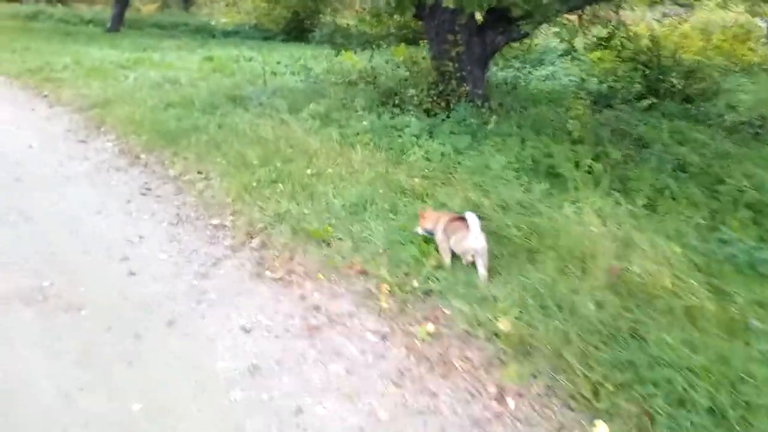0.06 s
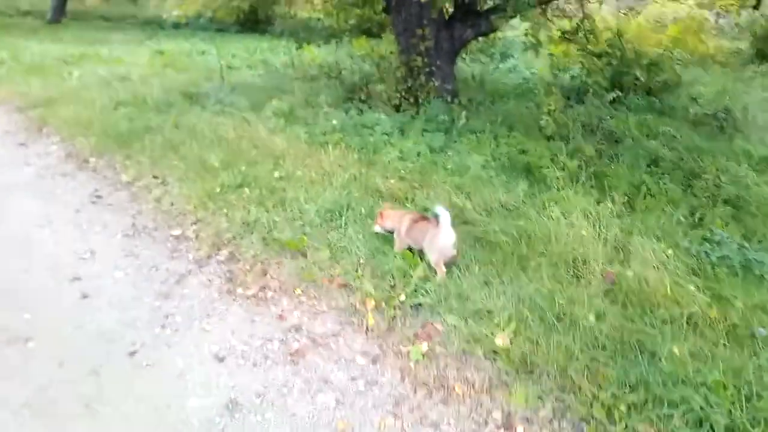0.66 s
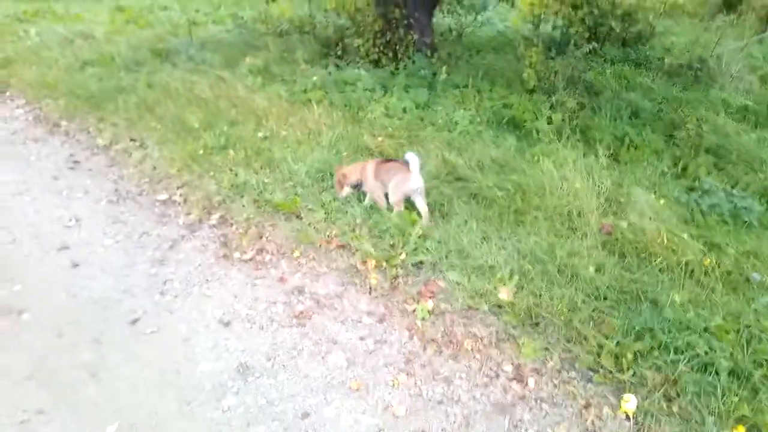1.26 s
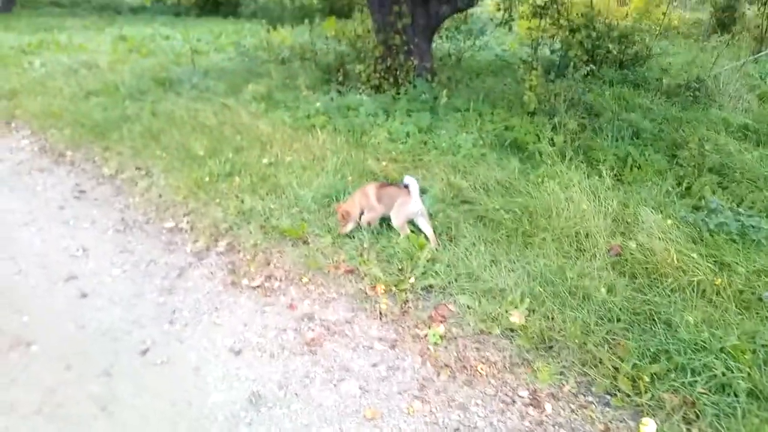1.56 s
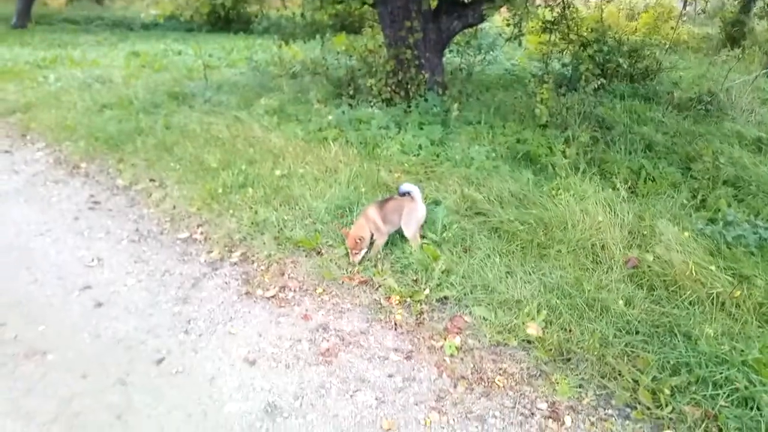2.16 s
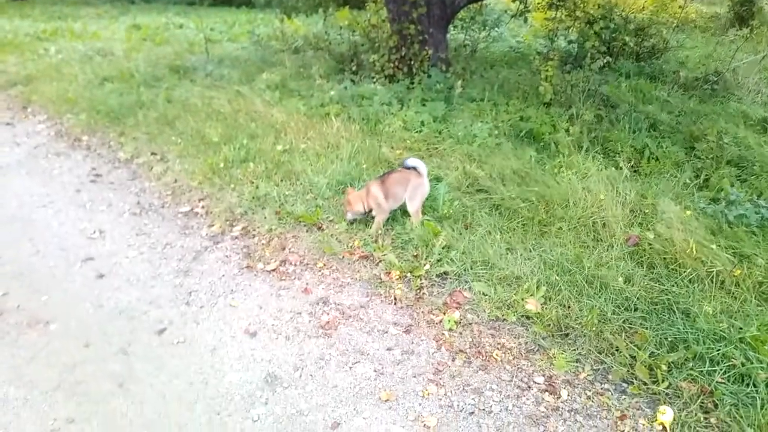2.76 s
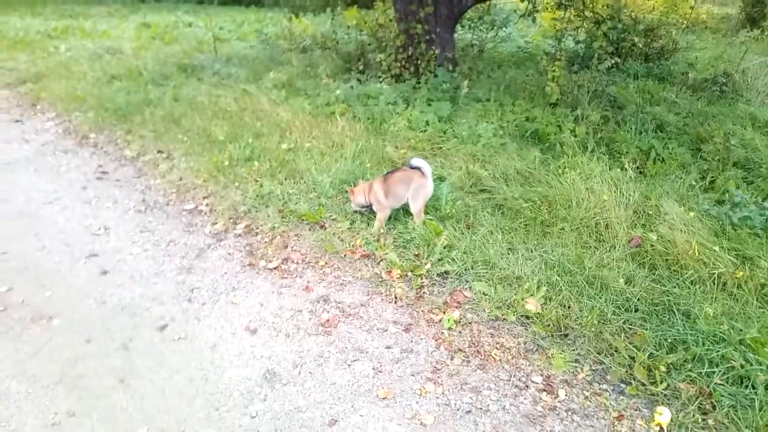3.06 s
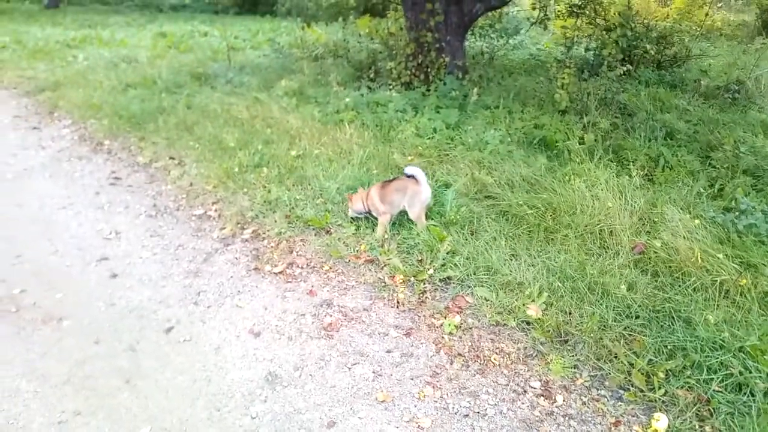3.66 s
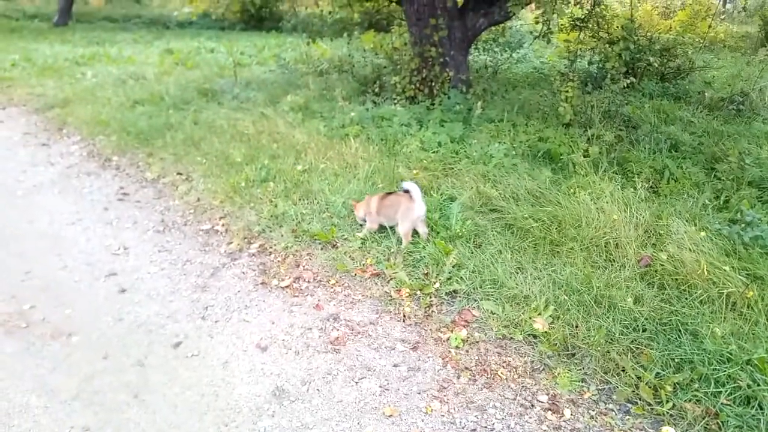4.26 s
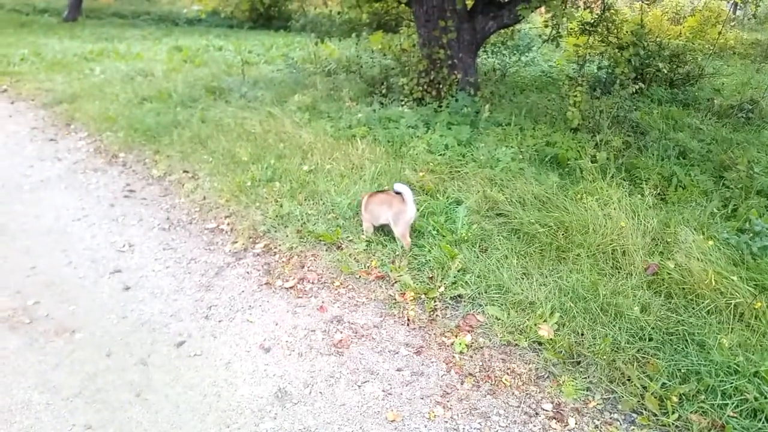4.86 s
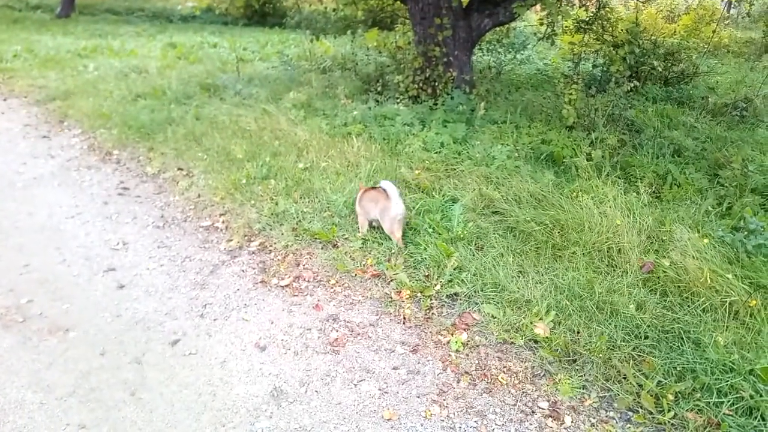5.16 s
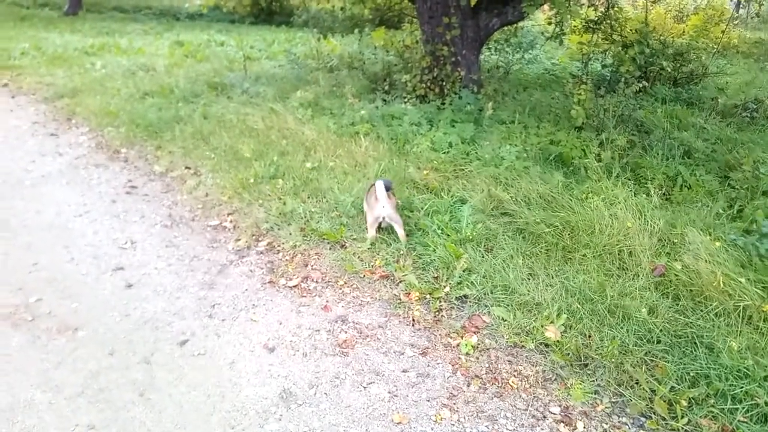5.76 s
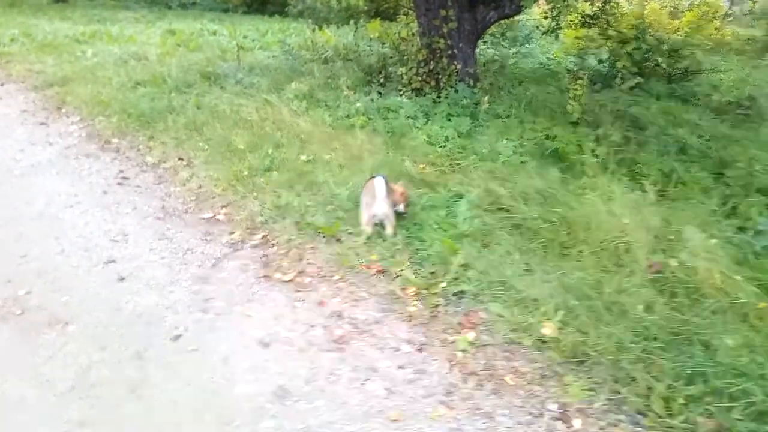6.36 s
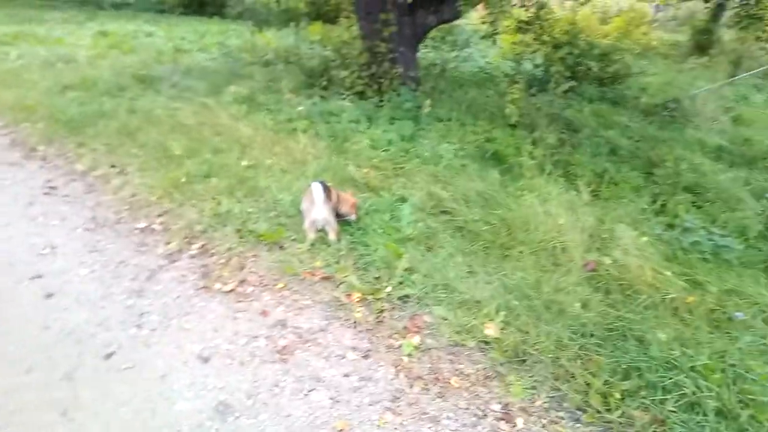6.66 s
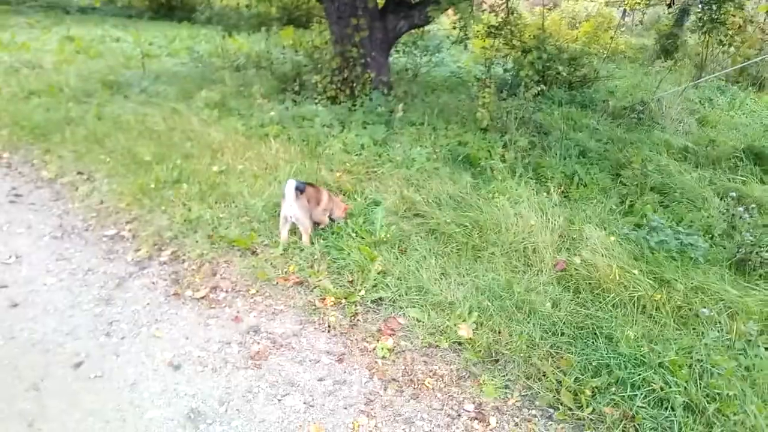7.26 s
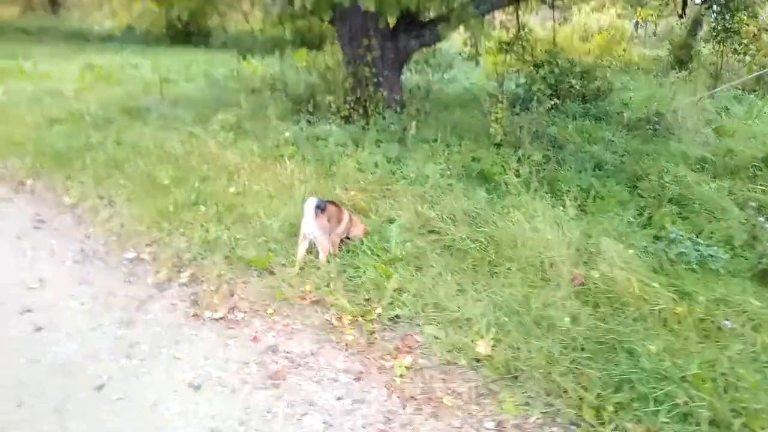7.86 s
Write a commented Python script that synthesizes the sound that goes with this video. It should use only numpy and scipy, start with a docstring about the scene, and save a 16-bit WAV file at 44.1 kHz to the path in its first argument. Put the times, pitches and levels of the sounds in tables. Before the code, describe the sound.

Grass swishes and dry stalks crackle as a small dog walks and stops, with a few short squeaks over soft outdoor air.

```python
"""A puppy walks through grass beside a path, close to the microphone, then stops and noses about.
Blades slip past each other in a fine rustle, stalks and dry leaves snap, and paws sweep the turf.
A soft whirr dies away as the walking ends. Three thin squeaks, each a buzz that slows in jumps,
fall into a rasp. Farther off, faint chirps sound over the low rumble and hiss of the open air."""
import sys
import numpy as np
from scipy import signal
from scipy.fft import rfft, irfft, next_fast_len
from scipy.io import wavfile
from scipy.ndimage import uniform_filter1d

SR = 44100
rng = np.random.default_rng(int(sys.argv[2]) if len(sys.argv) > 2 else 0)


def int16_out(signal):
    """Quantize to a 16-bit WAV file."""
    q = np.round(np.clip(np.atleast_2d(signal).T, -1, 1) * 32767)
    wavfile.write(sys.argv[1], SR, q.astype(np.int16))


N = 352824
TIME = np.arange(N) / SR

# a leg or the muzzle pushes through the blades: t/s at its height, length/s, level/dB
BRUSHES = [(0.022, 0.11, -40.5), (0.195, 0.11, -46.5), (0.309, 0.17, -39), (0.43, 0.22, -45),
           (0.513, 0.038, -39.5), (0.595, .05, -39), (0.648, 0.094, -43), (0.783, 0.24, -48.5),
           (0.97, 0.11, -55), (1.049, 0.054, -46), (1.198, 0.091, -48), (1.281, 0.036, -40.5),
           (1.359, 0.042, -47), (1.488, 0.059, -57.5), (2.56, 0.13, -64), (2.883, 0.072, -48.5),
           (3.054, 0.13, -61), (3.974, 0.14, -58.5), (4.575, 0.19, -61), (4.845, 0.12, -61.5),
           (5.508, .08, -69.5), (5.856, 0.043, -58.5), (6.783, 0.039, -61.5), (7.014, 0.22, -70.5),
           (7.255, 0.029, -60), (7.428, 0.18, -71), (7.714, 0.11, -64.5)]
# how much the puppy stirs the grass between brushes: t/s, level/dB
GRASS_STIR = [(0, -56), (1.3, -54), (1.52, -66), (1.8, -69), (2.05, -64.5), (2.45, -69.5), (2.82, -72),
              (2.92, -53), (3.3, -60.5), (3.85, -64.5), (4.6, -67.5), (4.75, -86), (5.75, -85), (5.92, -67),
              (6.48, -59), (6.66, -81), (8, -86)]
# a grass tick as heard through the microphone, which rings near 6 kHz: f/Hz, relative level/dB
TICK_AT_MIC = [(100, -64.5), (700, -31), (1200, -19.5), (1900, -19.5), (2700, -17.5), (3700, -18),
               (5000, -7.5), (6100, 7.5), (6700, -6.5), (7400, -22.5), (8400, -37), (11500, -52),
               (15000, -50.5), (16500, -68)]
# the whirr while the puppy walks: t/s, level/dB, centre f/Hz
WHIRR_COURSE = [(0, -63.5, 1166), (0.4, -60.5, 1333), (0.8, -61, 1177), (1.25, -65, 1170),
                (1.6, -73.5, 1110), (1.95, -75, 1140), (2.2, -82, 1160), (2.6, -100, 1220)]
# steady resonances in the whirr: f/Hz, width/Hz, relative level/dB
WHIRR_RINGS = [(1132, 25, -9), (1309, 40, -7), (2142, 30, -8), (2595, 90, -11)]
# spectrum of the open air at the microphone: f/Hz, relative level/dB
AIR_SPECTRUM = [(25, -12), (45, -15), (80, 1), (125, 0), (200, -8), (400, -12.5), (800, -16.5),
                (2000, -22.5), (4300, -27.5), (5300, -27.5), (6050, -20), (7000, -34.5), (8200, -40),
                (12000, -39.5), (13500, -38.5), (15100, -24.5), (16000, -30.5)]
# stalks and dry leaves snapping close by: t/s, peak level/dB, extra body below about 4.5 kHz/dB,
# woody resonance f/Hz
SNAPS = [(0.0175, -21, -13, 3730), (0.044, -28.5, -6, 1770), (0.1444, -28, 0, 2170),
         (0.1575, -19, 5.5, 1290), (0.166, -13, 10, 1310), (0.1835, -29, 8, 3250),
         (0.1896, -25.5, 10, 1260), (0.2124, -21.5, 10, 2370), (0.2472, -25, 7, 2280),
         (0.2728, -16.5, 3, 4290), (0.279, -23, -6, 4110), (0.6058, -25.5, 3, 3540),
         (0.6515, -20, -4.5, 3450), (0.759, -21, 1.5, 1140), (0.824, -28.5, 0, 2140),
         (0.8453, -22, 0, 3420), (0.8846, -26.5, 2, 1130), (0.8977, -23.5, 8.5, 3290),
         (0.9653, -13.5, 8, 2900), (1.0885, -28.5, -3, 3840), (1.0977, -25, 2.5, 3000),
         (1.1884, -26.5, -2, 2860), (1.2154, -26, -12, 1160), (1.2385, -20.5, -5, 3270),
         (1.3432, -21, 2, 3060), (1.3504, -27, 0, 2930), (1.421, -36.5, 1, 1250), (1.4325, -35, 0, 2840),
         (1.4633, -34, -16, 1230), (1.4762, -35, -10, 4290), (1.5845, -28, -1.5, 3220),
         (1.9472, -31, 10, 2820), (2.082, -37.5, 9, 1230), (2.1033, -32.5, 5, 2000),
         (2.211, -35.5, 1, 3100), (2.2691, -39, -17, 1040), (2.2758, -44, -11, 4290),
         (2.854, -32.5, 0, 2650), (2.8848, -27, 1, 2730), (2.913, -31.5, -3, 2450),
         (3.041, -31.5, -1, 4150), (3.1026, -39, -14, 4290), (3.234, -37, -18, 1570),
         (3.5507, -35.5, 11, 4200), (3.6592, -31.5, -8.5, 3500), (3.7146, -41, -9, 3930),
         (3.9562, -14, 9.5, 1500), (4.4952, -36.5, -1.5, 1490), (4.5418, -39.5, 1, 1420),
         (4.6269, -31, -7, 3730), (5.8553, -44.5, -6, 3400), (5.9706, -32.5, -6, 2380),
         (6.3654, -31, -1, 2070), (6.4183, -24.5, -4, 2880), (6.433, -35.5, 7, 2990), (6.46, -34, 1, 3850),
         (6.466, -20, 2.5, 2960), (6.562, -20, 1.5, 2890), (6.7552, -31, 3, 2750)]
# paw strokes in grass and turf: t/s, length/s, centre f/Hz, width/Hz, level/dB
PAW_SWIPES = [(0.163, 0.048, 1090, 350, -57), (0.294, 0.083, 8900, 3500, -74),
              (0.3, 0.053, 4600, 1240, -42), (0.501, 0.045, 9500, 2500, -72),
              (0.556, 0.17, 14800, 1500, -66), (0.627, 0.15, 450, 298, -67.5), (1.03, 0.1, 4630, 1000, -58),
              (1.236, 0.08, 3370, 1180, -59.5), (2.84, 0.12, 2200, 2000, -63.5), (4.462, 0.18, 90, 80, -73),
              (6.619, 0.22, 124, 69.4, -61.5)]
# distant chirps: t/s, length/s, start f/Hz, end f/Hz, width/Hz, level/dB
FAR_CHIRPS = [(0.255, 0.23, 11000, 12400, 250, -84), (0.42, 0.19, 12000, 9900, 400, -88),
              (0.78, 0.12, 2750, 2430, 225, -58.5), (4.02, 0.21, 5700, 5320, 90, -77),
              (4.346, 0.11, 5200, 4700, 700, -70), (4.386, 0.082, 3760, 3450, 300, -73.5),
              (4.773, 0.11, 2280, 2150, 300, -68), (4.852, 0.054, 2000, 1530, 200, -74.5),
              (5.085, 0.11, 4260, 3760, 250, -79.5), (5.135, 0.056, 5940, 5870, 70, -70.5),
              (5.426, 0.034, 5910, 6030, 129, -54), (5.775, 0.095, 4650, 4450, 250, -71),
              (5.84, 0.078, 3500, 3380, 150, -77), (5.99, 0.093, 6600, 6760, 120, -67.5),
              (6.058, 0.15, 6800, 6330, 150, -71.5), (6.952, 0.15, 4930, 3680, 900, -72)]
# squeaks: t/s, length/s, base f/Hz, opening bend/(octaves/s), base level/dB, roughness/(0-1),
# then t/s of three breaks, counted from the squeak's start
SQUEAKS = [(1.853, 0.2, 1315, 2, -52, 0.335, 0.06, .072, .112),
           (3.355, .19, 1336, -3, -43, 0.25, 0.026, 0.042, .101),
           (6.170, .155, 1242, -3, -38.5, 0.064, .022, .047, .105)]
# registers each squeak falls through: f/base f, resonance f/pitch, level step/dB, extra roughness/(0-1)
SQUEAK_REGISTERS = [(0.98, 1.93, 0.5, 0.04), (.775, 2.6, 2, 0.05), (.56, 2.7, -1, 0),
                    (0.47, 4.9, -1.5, .25)]
# tone colour of the squeaks as heard through the microphone: f/Hz, relative level/dB
SQUEAK_SPECTRUM = [(500, -55), (1100, -38), (1550, -18), (2100, -22), (2750, -11), (3900, -23), (4850, -10),
                   (5350, -12), (6150, 1), (6650, -6), (7400, -28), (9000, -48), (12000, -60)]

BAND_EDGE_HZ = 15500


def amp(db):
    """Decibels to gain."""
    return 10 ** (np.asarray(db) / 20)


def unit(x):
    """Scales to rms 1."""
    return x / np.sqrt(np.mean(x ** 2) + 1e-20)


def level_out(x, size):
    """Holds the rms near 1 over a sliding window of size samples."""
    return x / np.sqrt(abs(uniform_filter1d(x ** 2, size)) + 1e-12)


def spectrum_db(points, hz):
    """Reads a spectrum on a log-frequency axis."""
    f, db = np.transpose(points)
    return np.interp(np.log(hz + 1), np.log(f), db)


def add(mix, s, sound):
    """Mixes a sound in at time s."""
    part = mix[max(round(s * SR), 0):][:len(sound)]
    part += sound[:len(part)]


def drift(n, hz):
    """A smooth random curve of rms 1, with little movement faster than hz."""
    size = next_fast_len(n)
    smooth = np.exp(-(np.fft.rfftfreq(size, 1 / SR) / hz) ** 2)
    return unit(irfft(rfft(rng.standard_normal(N), size) * smooth, size)[:n])


def impulse_response(db):
    """Minimum-phase response with the given gains on an even frequency grid."""
    cepstrum = irfft(np.log(amp(db)))
    half = len(cepstrum) // 2
    cepstrum[1:half] *= 2
    cepstrum[half + 1:] = 0
    return irfft(np.exp(rfft(cepstrum)))


def resonate(x, hz, width):
    """A resonance of gain 1 that follows the curve hz."""
    carrier = np.exp(2j * np.pi * np.cumsum(hz * np.ones(len(x))) / SR)
    pole = np.exp(-np.pi * width / SR)
    return 2 * (carrier * signal.lfilter([1 - pole], [1, -pole], x / carrier)).real


def noise_band(n, hz, width):
    """Noise of rms 1 in a steep resonance: a fuzzy tone when narrow."""
    x = rng.standard_normal(N)[:n]
    for _ in range(3):
        x = resonate(x, hz, 2 * width)
    return unit(x)


def grass_tick(body_db, wood_hz, ripple_db, wood_db=9, wood_width_hz=380):
    """One tick of grass: an uneven body with a woody resonance, under the microphone's bright ring."""
    hz = np.fft.rfftfreq(512, 1 / SR)
    ripple = unit(uniform_filter1d(uniform_filter1d(rng.standard_normal(len(hz)), size=7), size=5))
    body = np.interp(hz, [3800, 5500], [1, 0])
    wood = np.exp(-((hz - wood_hz) / wood_width_hz) ** 2)
    db = spectrum_db(TICK_AT_MIC, hz) + body_db * body + wood_db * wood + ripple_db * ripple
    return impulse_response(db)


def movement_db(rise_share=0.38, edge_drop_db=11):
    """Each brush of a leg or the muzzle swells and fades over the slow stirring of the grass."""
    power = amp(np.interp(TIME, *np.transpose(GRASS_STIR))) ** 2
    for s, length, db in BRUSHES:
        from_peak = (TIME - s) / (length * np.where(TIME < s, rise_share, 1 - rise_share))
        near = abs(from_peak) < 2
        power[near] += amp(db - edge_drop_db * from_peak[near] ** 2) ** 2
    return 10 * np.log10(power)


def grass_rustle(base_ticks_per_s=1700, crowding=0.42, spread_db=5.0, trim_db=-1.5, colours=16):
    """Blades slip past each other near the microphone; livelier movement brings more small ticks."""
    db = movement_db()
    ticks_per_s = base_ticks_per_s * amp(crowding * (np.maximum(db, -65) + 45))  # base rate at -45 dB
    out = np.zeros(N)
    for wood_hz in np.linspace(2500, 5300, colours):
        sizes = amp(spread_db * np.minimum(rng.exponential(1, N), 3.2))
        slips = sizes * rng.choice([-1, 1], N) * (rng.random(N) < ticks_per_s / colours / SR)
        tick = grass_tick(body_db=1.1, wood_hz=wood_hz, ripple_db=5.0, wood_db=6.5, wood_width_hz=550)
        out += signal.oaconvolve(slips, tick)[:N]
    return level_out(out, size=1300) * amp(db + trim_db)


def whirr(width_hz=240, wash_db=-6, wash_width_hz=1300):
    """A soft hollow whirr that sinks a little as it fades."""
    s, db, hz = np.transpose(WHIRR_COURSE)
    centre = np.interp(TIME, s, hz)
    tone = noise_band(N, centre, width_hz) + amp(wash_db) * noise_band(N, centre, wash_width_hz)
    tone += sum(amp(level) * noise_band(N, f, width) for f, width, level in WHIRR_RINGS)
    return tone * amp(np.interp(TIME, s, db))


def open_air(base_db=-64.5, split_hz=260, walk_db=6.5, settle_s=1.07, hum_hz=78.95, hum_db=-74):
    """A lumpy far rumble that settles as the walking ends, with a wavering hum and a smooth hiss."""
    hz = np.fft.rfftfreq(N, 1 / SR)
    noise = unit(irfft(rfft(rng.standard_normal(N)) * amp(spectrum_db(AIR_SPECTRUM, hz)), N))
    rumble = irfft(rfft(noise) / (1 + (hz / split_hz) ** 2), N)
    hiss = noise - rumble
    swell_db = walk_db * np.exp(-TIME / settle_s) + 1.5 * drift(N, hz=9.8)
    hum = amp(hum_db) * noise_band(N, hum_hz, width=3)
    return amp(base_db) * (hiss + rumble * amp(swell_db)) + hum


def stalk_snaps(fibres=3, fibre_db=-24, spread_s=0.0051):
    """Close stalks break in about a millisecond; a few fibres give way just before and after."""
    out = np.zeros(N)
    for s, db, body_db, wood_hz in SNAPS:
        tick = grass_tick(body_db, wood_hz, ripple_db=2.5)
        tick = amp(db) * tick / abs(tick).max()
        add(out, s, tick)
        for lag, size in rng.standard_normal((fibres, 2)):
            add(out, s + spread_s * lag, amp(fibre_db) * size * tick)
    return out


def paw_swipes(grain_db=3.1):
    """A paw sweeps the grass or presses the turf: a short grainy swell of noise, fizzy or dull."""
    out = np.zeros(N)
    for s, length, hz, width, db in PAW_SWIPES:
        n = int(length * SR)
        grainy = noise_band(n, hz, width) * amp(grain_db * drift(n, hz=400))
        add(out, s, amp(db) * unit(grainy * np.hanning(n)))
    return out


def far_chirps():
    """Faint gliding chirps, blurred by distance."""
    out = np.zeros(N)
    for s, length, start_hz, end_hz, width, db in FAR_CHIRPS:
        n = int(length * SR)
        glide = noise_band(n, np.linspace(start_hz, end_hz, n), width)
        add(out, s, amp(db) * unit(glide * signal.windows.tukey(n, 0.7)))
    return out


def squeak_course(t, length, base_hz, bend, base_db, roughness, *breaks,
                  sag_octaves_per_s=5.5, attack_s=0.013, release_s=0.014, roughen_s=0.025):
    """Pitch, level, roughness and resonance of a thin squeal that breaks to ever lower registers."""
    register = np.searchsorted(np.sort(breaks), t)
    steps = np.transpose(SQUEAK_REGISTERS)[:, register]
    share, overtone, step_db, extra_rough = uniform_filter1d(steps, size=130, axis=1)
    hz = base_hz * share * 2 ** (np.where(register == 0, bend, -sag_octaves_per_s) * t)
    gate = np.clip(np.minimum(t / attack_s, (length - t) / release_s), 1e-3, 1)
    fade_db = np.interp(t / length, [0.4, 1], [0, -11.5])
    db = base_db + step_db + 20 * np.log10(gate) + fade_db
    rasp = 0.33 * sum(np.exp(-((t - s) / 0.0048) ** 2) for s in breaks)  # a few ms around each break
    rough = (roughness + extra_rough) * np.minimum(t / roughen_s, 1) + rasp
    return hz, db, np.clip(rough, 0, 1), hz * overtone


def squeaks(jitter=0.0596, resonance_db=7.0, width_hz=300, shimmer_db=3, flutter_db=3):
    """A buzz slows down in jumps and rings a gliding resonance; its overtones flutter one by one."""
    out = np.zeros(N)
    colour = impulse_response(spectrum_db(SQUEAK_SPECTRUM, np.fft.rfftfreq(1024, 1 / SR)))
    orders = np.arange(1, 33)[:, None]
    for s, length, *manner in SQUEAKS:
        t = np.arange(0, length, 1 / SR)
        n = len(t)
        hz, db, rough, resonance_hz = squeak_course(t, length, *manner)
        cycles = np.cumsum(hz * (1 + jitter * rough * drift(n, hz=300))) / SR  # rough stretches waver
        flutter, sway = (drift(len(orders) * n, hz=37).reshape(-1, n) for _ in range(2))
        partials = amp(flutter_db * flutter) * np.cos(2 * np.pi * orders * cycles + sway / 2)
        buzz = (partials * (orders * hz < BAND_EDGE_HZ)).sum(0)
        puffs = np.exp(-2 * (cycles % 1)) * rng.standard_normal(N)[:n]  # one puff of noise a cycle
        drive = (1 - rough) * unit(buzz) + rough * unit(puffs)
        ringing = drive + amp(resonance_db) * resonate(drive, resonance_hz, width_hz)
        squeak = level_out(signal.oaconvolve(ringing, colour)[:n], size=400)
        add(out, s, squeak * amp(db + shimmer_db * rough * drift(n, hz=250)))
    return out


def scatter(x, wet_db, t60):
    """Ground, bushes and a tree throw a weak diffuse tail back to the microphone."""
    t = np.arange(SR // 2) / SR
    tail = rng.standard_normal(len(t)) * np.exp(-np.log(1000) * t / t60) * (t > 0.003)
    return x + amp(wet_db) * signal.oaconvolve(x, tail / np.linalg.norm(tail))[:N]


def scene():
    """One microphone by the path: grass close up, squeaks and chirps around it, open air behind."""
    grass = scatter(stalk_snaps(), wet_db=-17.0, t60=0.23)
    grass += scatter(grass_rustle(), wet_db=-9.0, t60=0.12)
    grass += paw_swipes()
    calls = scatter(squeaks(), wet_db=-9.5, t60=0.45)
    calls += scatter(far_chirps(), wet_db=-7.0, t60=0.39)
    return (grass + calls + whirr() + open_air())[None]


def record(dry):
    """The recorder's band limit cuts the highest treble."""
    lowpass = signal.firwin(511, BAND_EDGE_HZ, window=("kaiser", 9), fs=SR)
    return signal.oaconvolve(dry, lowpass[None], "same")


dry = scene()
out = record(dry)
int16_out(out)
```